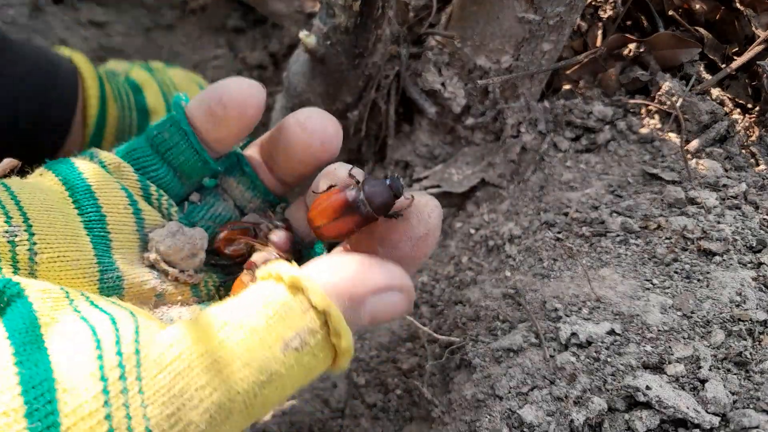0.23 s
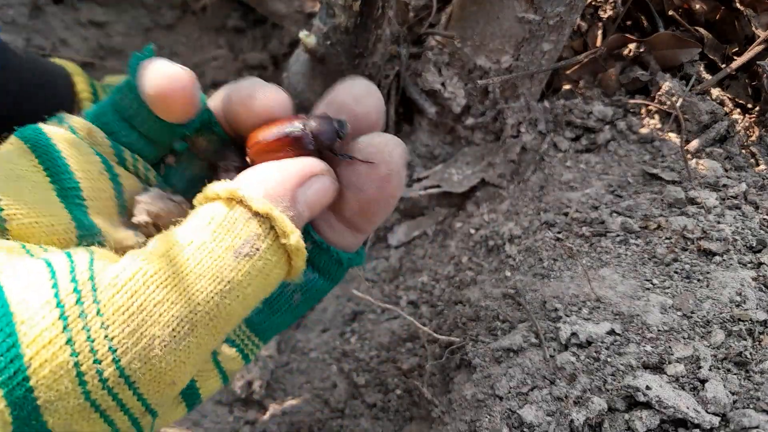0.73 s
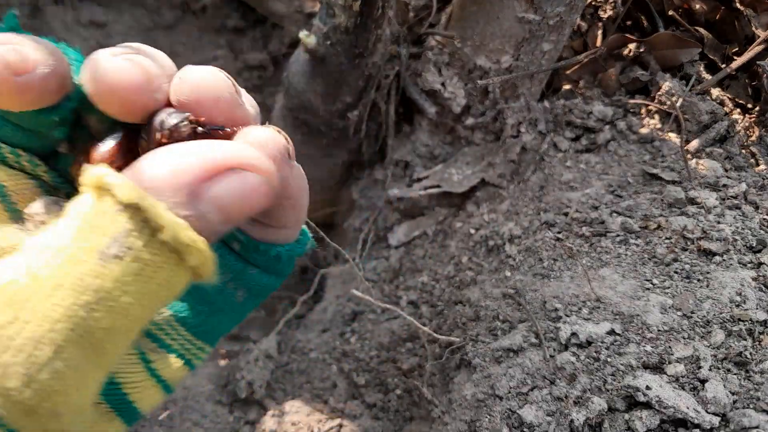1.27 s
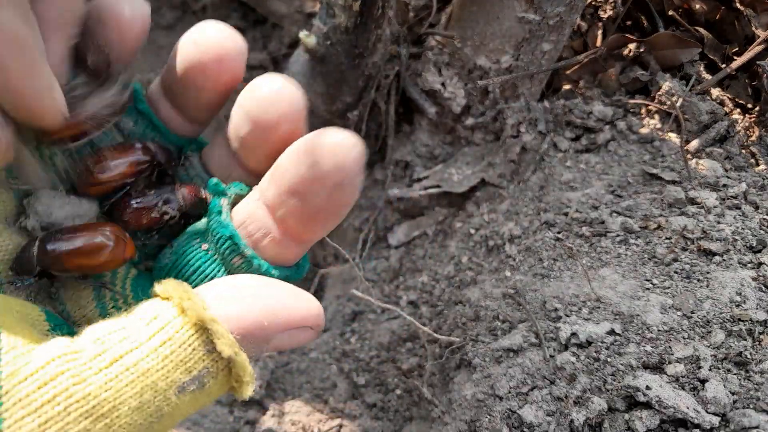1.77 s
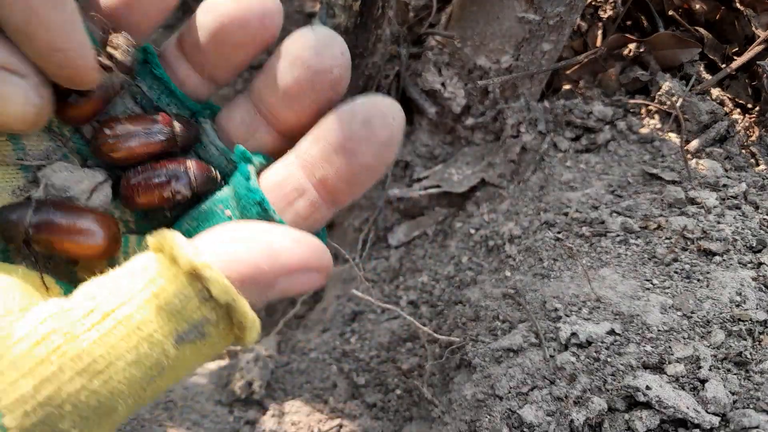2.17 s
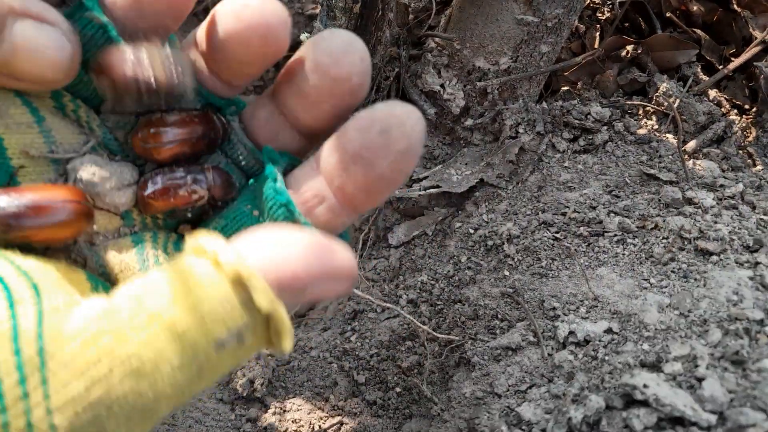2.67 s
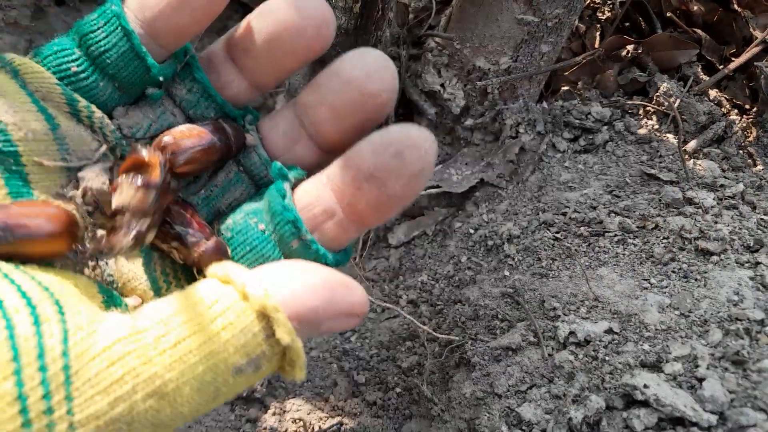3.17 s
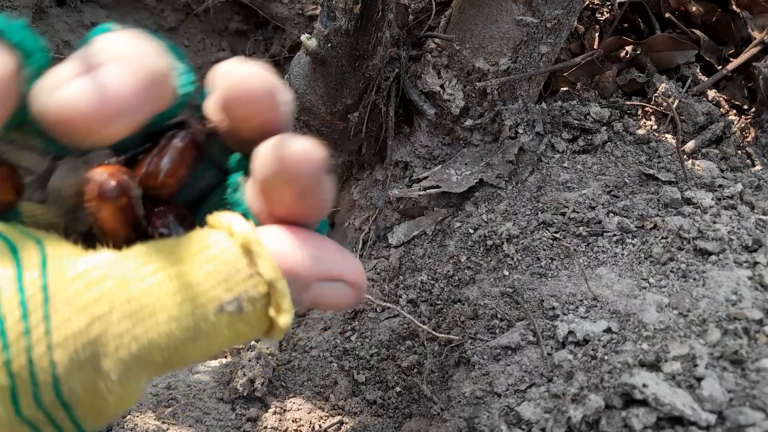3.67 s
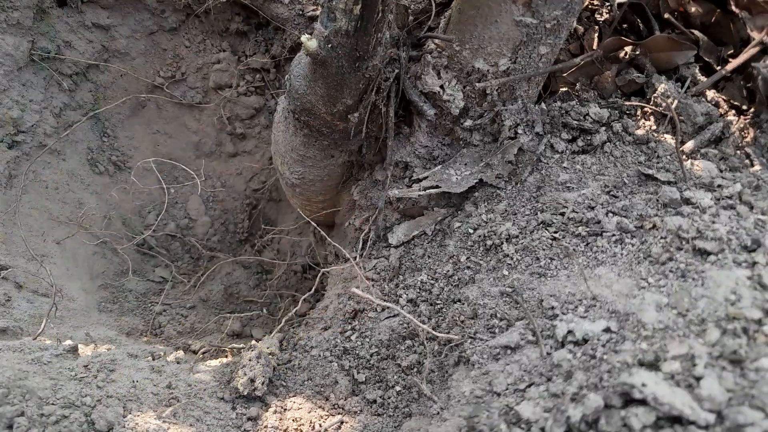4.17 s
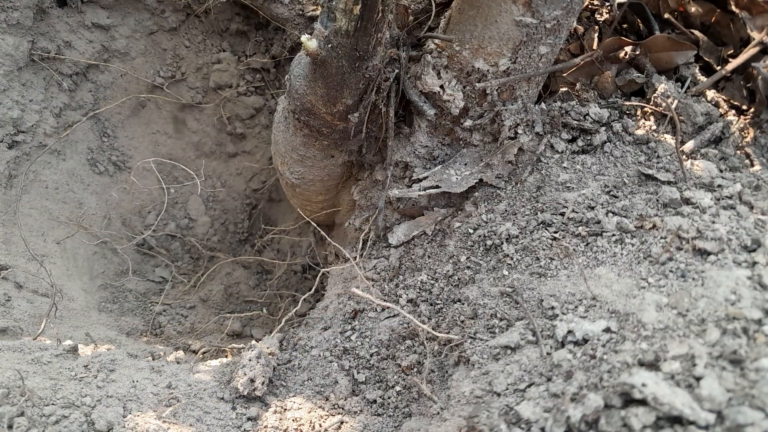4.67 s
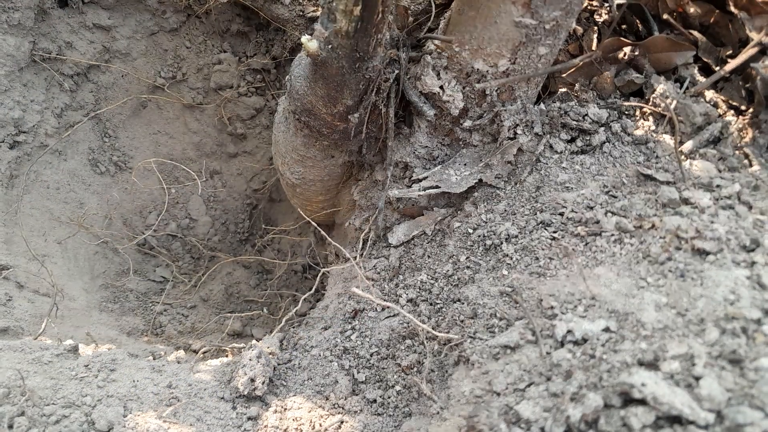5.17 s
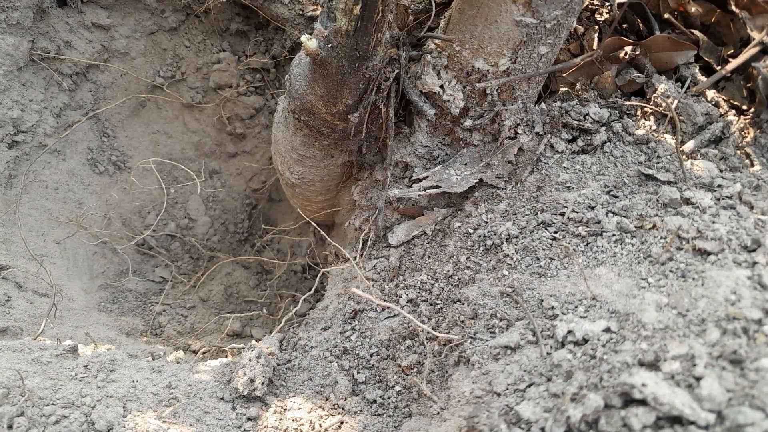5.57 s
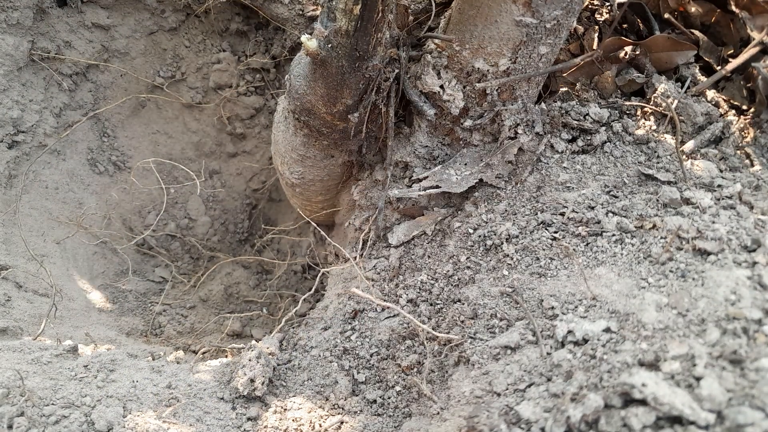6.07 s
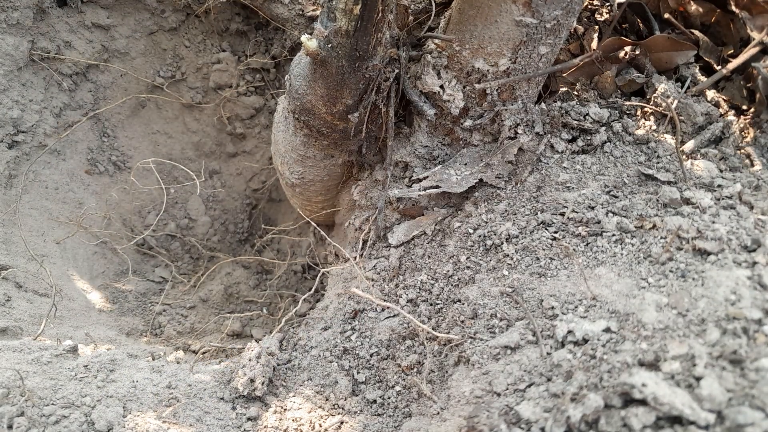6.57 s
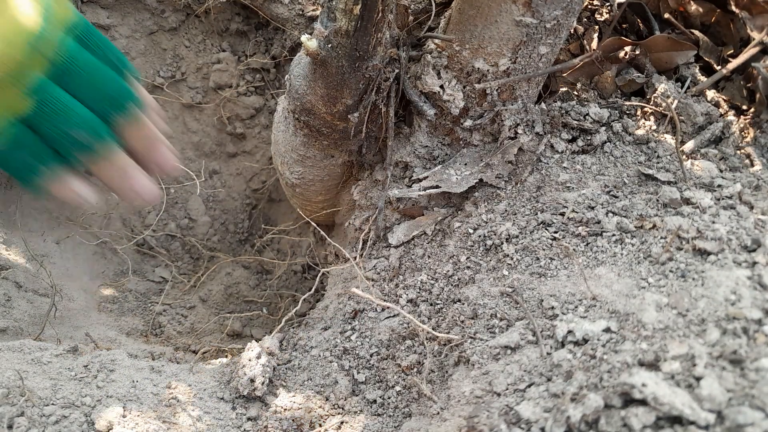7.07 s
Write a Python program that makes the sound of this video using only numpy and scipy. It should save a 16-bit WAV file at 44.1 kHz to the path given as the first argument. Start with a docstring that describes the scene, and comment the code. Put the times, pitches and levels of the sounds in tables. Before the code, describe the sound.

Close, dry digging with a small spade: gritty crunches, dull clanks and a scrape, with a glove rustling before and brushing soil after.

```python
"""A dusty knitted glove rustles, close up and outdoors. Then a small metal spade sinks into dry, crumbly
soil on the left, stirs it and knocks twice, drags over hard clods straight ahead with a dull clank, and
the glove brushes loose crumbs. Soil and yarn are showers of tiny noise grains; each knock is a cracking
clod, a damped steel ring and a ground thud. The shallow pit adds a short tail, over low rumble and hiss."""
import sys
import numpy as np
from scipy import signal
from scipy.fft import rfft, irfft
from scipy.io import wavfile
from scipy.ndimage import uniform_filter1d

SR = 44100
rng = np.random.default_rng(int(sys.argv[2]) if len(sys.argv) > 2 else 0)


def log_audio(samples):
    """Write samples as a 16-bit WAV file to the path given in sys.argv[1]."""
    # one column per channel
    frames = np.atleast_2d(samples).T
    # limit to full scale, then quantise
    limited = np.clip(frames, -1, 1)
    pcm = np.round(limited * 32767).astype(np.int16)
    wavfile.write(sys.argv[1], SR, pcm)


N = 322371

# Cue sheets. Their levels are set ahead of each layer's trim and EQ.
# blade levering loose soil: start_s, length_s, grit_db, body_db
STIR_CUES = [(3.195, 0.046, -65.5, -76.5), (3.235, 0.054, -67, -75), (3.565, 0.017, -71, -64),
             (3.79, 0.088, -66.5, -69.5), (3.875, 0.2, -56, -67), (4.055, 0.17, -55, -61.5),
             (4.26, 0.11, -51.5, -58.5), (4.435, 0.071, -59.5, -57), (4.56, 0.29, -69, -78),
             (4.86, 0.049, -59, -59.5), (4.97, 0.15, -72.5, -81), (5.14, 0.17, -78.5, -96)]
# short dry crunches of soil, from the glove rustling, the blade digging and the glove brushing:
# peak_s, level_db, rise_ms, fall_ms, body_relative_db, crisp_hz
CRUNCH_CUES = [(1.355, -47.5, 9, 6.9, -20, 8400), (1.452, -46, 0.84, 7, -23, 11300),
               (1.685, -59.5, 3.6, 10, 0.5, 9100), (2.229, -48.5, 1.6, 2.1, -30, 5330),
               (2.884, -62, 3.7, 3.8, -4, 2600), (3.245, -45, 4, 14, -12, 12400),
               (3.268, -41, 1.2, 3.4, -14, 4930), (3.283, -28, 3.46, 5, -21, 12300),
               (3.289, -23, 2.44, 1.4, -7.5, 9650), (3.34, -40.5, 2.3, 4.5, -7.5, 10800),
               (3.554, -38, 4.5, 2.3, -24, 11400), (3.599, -28.5, 3.3, 2.8, -13.5, 14500),
               (3.785, -39.5, 0.63, 1.5, -1, 10000), (3.791, -36.5, 1.55, 3.9, -5, 8100),
               (3.882, -42, 3.1, 3.2, -7.5, 9500), (3.934, -43, 5.4, 4.7, -6, 5700),
               (4.088, -37, 9.6, 1.7, -13.5, 6270), (4.113, -46, 3.9, 3, -8, 3660),
               (4.177, -44, 8.7, 9, -6, 3680), (4.226, -43.5, 3, 9.2, -6, 12700),
               (4.2866, -26, 0.31, 5.4, -9, 9500), (4.2947, -25.5, 2.57, 4, -13.5, 4100),
               (4.315, -33, 2.5, 15.4, -3.5, 9100), (4.3277, -27, 4.4, 5.7, -28, 3930),
               (4.465, -41.5, 1.07, 2.1, 5.5, 4400), (4.511, -49, 0.86, 17, -3, 5730),
               (4.874, -51.5, 5.5, 13, -1, 5200), (4.904, -46, 1.7, 24, -10, 12870),
               (6.763, -42.5, 2.6, 5.3, -36, 12500), (7.126, -44, 2, 26, -26, 7600),
               (7.178, -29, 4, 3.8, -42, 7550), (7.186, -33.5, 2, 6.8, -34, 2920),
               (7.21, -43.5, 1.06, 10.5, -12, 5840), (7.22, -30, 0.88, 0.65, -33, 7600),
               (7.282, -41, 1, 3.2, -9, 9300)]
# blade striking hard clods: time_s, crack_db, rise_ms, fall_ms, ring_db, thud_db
KNOCK_CUES = [(4.474, -62, .3, 1.8, -51.5, -49.5), (5.6463, -27, .26, 4.7, -38, -33),
              (5.6826, -24, .3, 2.05, -54, -44), (6.015, -52, .2, 5, -55.5, -57.5),
              (6.2084, -24.5, 2.3, 2.4, -27.5, -36.5), (6.281, -39, .36, 12, -40, -66),
              (6.286, -27.5, .4, 7.6, -48, -49), (6.3, -24.5, .22, 2.5, -44, -41),
              (6.3079, -30, .8, 7.5, -34.5, -44.5), (6.321, -46, .75, 2.8, -58, -66),
              (6.352, -37, .8, 3.7, -54, -60), (6.366, -34.5, .9, 6.4, -44, -65)]
# blade dragged flat over packed earth: start_s, length_s, rasp_db, body_db
DRAG_CUES = [(5.68, 0.066, -63.5, -77), (5.8, 0.14, -64.5, -72.5), (5.9, .06, -62.5, -75),
             (5.995, 0.093, -55.5, -66.5), (6.105, 0.094, -46.5, -69), (6.205, 0.026, -50.5, -48),
             (6.28, 0.11, -48.5, -60.5), (6.42, 0.09, -57.5, -72), (6.58, 0.097, -65.5, -80)]
# single crumbs snapping or dropping: time_s, level_db
CRUMB_CUES = [(0.0837, -67), (.7322, -58), (1.1036, -55), (1.1566, -58), (1.181, -50.5), (1.241, -48.5),
              (1.317, -49), (1.435, -46), (1.478, -42.5), (1.4826, -39), (1.4919, -47), (1.682, -50.5),
              (1.9244, -57), (2.28, -53.5), (2.346, -56.5), (2.739, -58.5), (2.8412, -57), (3.177, -57.5),
              (3.8315, -51), (4.0888, -32), (5.089, -49), (5.4146, -57.5), (5.8236, -51), (6.793, -44),
              (7.0731, -50), (7.2483, -46)]
# glove flexing: start_s, length_s, crackle_db, rub_db
FLEX_CUES = [(.815, 0.42, -75.5, -74), (1.09, 0.14, -71.5, -71), (1.24, 0.14, -63.5, -69),
             (1.385, 0.12, -69, -89), (1.52, 0.15, -78.5, -96), (1.67, 0.16, -71.5, -88),
             (1.88, 0.16, -76.5, -93), (2.16, 0.092, -68, -89), (2.42, .11, -74.5, -90),
             (2.79, 0.11, -79.5, -82)]
# glove sweeping the soil: start_s, length_s, grit_db, sizzle_db, sizzle_hz
SWEEP_CUES = [(6.736, 0.097, -57.5, -54, 13000), (6.862, 0.066, -57, -50, 12700),
              (6.934, 0.098, -57, -48, 12900), (7.059, 0.1, -57, -51, 11500),
              (7.15, 0.19, -57.5, -60, 12100)]
# hand and tool bumping the ground: peak_s, level_db
BUMP_CUES = [(.54, -66), (3.271, -52), (3.745, -56), (4.311, -54), (4.501, -53), (4.622, -57), (5.302, -63),
             (5.665, -52), (6.219, -63), (6.309, -54), (6.514, -56), (6.794, -59), (7.137, -54),
             (7.215, -62)]
# brief dips in the rumble: time_s, dip_db
LULL_CUES = [(.39, -8.5), (1.23, -8.5), (2.2, -11), (2.58, -0.5), (2.73, -8), (3.11, -8.5), (4.0, -2),
             (5.19, -8), (5.5, -9), (5.82, -7.5), (6.69, -3.5), (6.95, -4)]

# ringing modes: pitch_hz, level_db, t60_s
BLADE_MODES = [(1813, 8, 0.03), (2028, 6.5, 0.022), (2236, 2.5, 0.032), (2440, -22, 0.036),
               (2590, -18, 0.13), (3020, 8, 0.016), (4070, -13, 0.028), (4900, -6, 0.013)]  # steel damped by soil
THUD_MODES = [(149, -7, 0.033), (239.3, -1, 0.088), (339, 0.5, 0.064), (424, -1, 0.073), (630, 3, 0.017),
              (705, 5, 0.034), (1035, 6, 0.035), (1230, 6, 0.019)]  # handle and packed ground

# EQ shapes of the layers: frequency_hz, relative_db
STREAM_EQ = [(1000, -9), (1400, -12.5), (2000, -3.5), (2550, -9), (3100, -3.5), (3750, 1), (5000, -1.5),
             (6000, -0.5), (7200, -5.5), (9500, -2.5), (12000, -1), (16000, -5)]  # sand streaming along the blade
GROAN_EQ = [(120, -6.5), (230, -5), (340, 0.5), (430, 6), (560, 0), (750, -5.5), (1000, -8), (1800, -24),
            (4000, -30)]  # hollow cut
GRIT_EQ = [(900, -23.5), (2000, -12.5), (2700, -4.5), (3500, -2.5), (5000, -1), (6300, -2.5), (8000, -2.5),
           (10500, -2), (13500, -3), (16000, -10)]  # bright top of loose soil
BODY_EQ = [(90, -3), (200, 1.5), (350, 0.5), (620, 2), (850, 1), (1100, -1), (1500, -4), (2200, -3),
           (4000, -13)]  # dull body of soil and glove
CRACK_EQ = [(150, -22), (600, -1), (1200, -3), (2200, -0.5), (4300, -1.5), (6000, -6.5), (8000, -8),
            (10500, -6.5), (16000, -17.5)]  # struck clod
RASP_EQ = [(300, -20), (620, -4.5), (900, -11), (1400, -6), (1850, -3), (2500, -1.5), (3300, -6.5),
           (4500, -6), (7500, -12), (9800, -10.5), (12000, -10.5), (16000, -15)]  # steel on packed earth
DRAG_BODY_EQ = [(90, -4), (200, -2.5), (330, 0), (480, -3), (700, -12.5), (1500, -21.5)]  # weight under the rasp
SNAP_EQ = [(600, -21.5), (2000, -18.5), (3500, -3.5), (5500, -1.5), (8000, 0.5), (12000, 1.5),
           (16000, -2.5)]  # snapping crumb
YARN_EQ = [(350, -34), (600, -7), (997, -5.5), (1190, -22), (1700, -2.5), (2720, -4.5), (4840, -1),
           (10200, -2.5), (16000, -4)]  # crackling yarn
BRUSH_EQ = [(250, -1.5), (650, -4), (1000, -7), (1600, -4.5), (2100, -3), (3100, 0.5), (5500, -2),
            (6500, -1.5), (7800, -3), (10000, -10.5), (13000, -7), (16000, -21)]  # glove on soil
RUMBLE_EQ = [(20, -36.5), (40, -8), (62, 1.5), (85, -2.5), (120, -4.5), (170, -14.5), (260, -22.5),
             (500, -34), (1000, -55.5)]  # outdoor low end
AIR_EQ = [(120, -16.5), (200, -1), (491, -11.5), (851, -13.5), (950, -16), (2020, -19), (3490, -21),
          (9580, -16), (15100, -19), (16000, -31.5)]  # outdoor hiss

# stereo balance at the microphone: frequency_hz, left_over_right_db
LEFT_BALANCE = [(200, -0.5), (500, -1), (950, 5), (1700, -3.5), (2500, 1), (3600, 3.5), (6000, 7),
                (9500, 5), (14000, 9)]  # work on the left
AHEAD_BALANCE = [(300, -1), (1300, -8), (2500, -6.5), (6000, -1.5), (14000, 1)]  # blows straight ahead

SHIFT_S = 5.8  # the knocks move from the left of the pit to straight ahead
SWEEP_ATTACK_S, SWEEP_RELEASE_S = 0.041, 0.048


def plunge():
    """One long push: sand streams louder along the sinking blade while the cut's hollow groan is choked."""
    push = dict(start_s=3.305, length_s=0.27, attack_s=0.026, release_s=0.015)
    stream = amp(-47.5) * stroke(**push, swell_db=6) * grains(per_s=5000, spread_db=1.9, alike=0.31)
    groan = amp(-57) * stroke(**push, swell_db=-10.5) * grains(per_s=1200, spread_db=1.9, alike=1)
    return colour(stream, STREAM_EQ) + colour(groan, GROAN_EQ)


def loose_soil():
    """Grit under each stir, and short dry crunches as the glove rustles, the blade digs, the glove brushes."""
    flicker = wander(depth_db=0.6, slow_s=0.013)
    grit_gain, body_gain = strokes(STIR_CUES, attack_s=0.017, release_s=0.051) * flicker
    grit = amp(0.5) * grit_gain * grains(per_s=1900, spread_db=3.7, alike=0.047)
    body = amp(1) * body_gain * grains(per_s=700, spread_db=1.7, alike=0.61)
    for peak_s, db, rise_ms, fall_ms, body_db, crisp_hz in CRUNCH_CUES:
        lead_s, crisp = burst(rise_ms, fall_ms, alike=0.13, rough_db=2.5)
        crisp += 2.36 * resonate(crisp, crisp_hz, width_hz=490)
        add(grit, peak_s - lead_s, amp(db - 4.5) * crisp)
        lead_s, dull = burst(rise_ms, fall_ms * 1.8, alike=0.58, rough_db=1.5)
        hollow_hz = 890 * 2 ** rng.uniform(-0.378, 0.6)  # each crunch has its own hollow note
        dull += 0.53 * resonate(dull, hollow_hz, width_hz=130)
        add(body, peak_s - lead_s, amp(db + body_db - 3.5) * dull)
    return colour(grit, GRIT_EQ) + colour(body, BODY_EQ)


def knocks():
    """Each blow cracks a clod, rings the blade and thuds into the ground: first on the left, then ahead."""
    left, ahead = np.zeros((2, 2, N))
    for time_s, crack_db, rise_ms, fall_ms, ring_db, thud_db in KNOCK_CUES:
        spot = left if time_s < SHIFT_S else ahead
        lead_s, crack = burst(rise_ms, fall_ms, alike=0.62, rough_db=-1)
        clank = amp(ring_db + 1.5) * ring(BLADE_MODES, attack_ms=0.94, detune=0.0034)
        thud = amp(thud_db + 1) * ring(THUD_MODES, attack_ms=0.86, detune=0.038)
        add(spot, time_s - lead_s, colour(amp(crack_db) * crack, CRACK_EQ))
        add(spot, time_s, np.tile(clank + thud, (2, 1)))
    return place(left, balance_db=0.5, lead_ms=0.427) + place(ahead, AHEAD_BALANCE, lead_ms=-0.052)


def dragging():
    """The flat of the blade rasps over packed earth straight ahead."""
    rasp_gain, body_gain = strokes(DRAG_CUES, attack_s=0.007, release_s=0.041, swell_db=3)
    rasp = amp(0.7) * rasp_gain * grains(per_s=3000, spread_db=2.4, alike=0.16)
    body = amp(6) * body_gain * grains(per_s=600, spread_db=1.1, alike=0.9)
    return place(colour(rasp, RASP_EQ) + colour(body, DRAG_BODY_EQ), balance_db=-1.5, lead_ms=-0.11)


def crumbs():
    """A dry crumb snaps in one sharp tick, then its dust gives a tiny puff."""
    out = np.zeros((2, N))
    for time_s, db in CRUMB_CUES:
        tick = rng.choice([-1, 1]) * np.ones((2, 1))
        _, puff = burst(rise_ms=0.089, fall_ms=1, alike=0.24, rough_db=2)
        add(out, time_s, amp(db + 14) * tick)
        add(out, time_s, amp(db + 2.5) * puff)
    return colour(out, SNAP_EQ)


def glove():
    """Knitted yarn rubs dust and sheds crumbs in the palm, and later brushes the ground."""
    flicker = wander(depth_db=3.3, slow_s=0.05)
    crackle_gain, rub_gain = strokes(FLEX_CUES, attack_s=0.023, release_s=0.043) * flicker
    sweep_gain, _ = strokes(SWEEP_CUES, SWEEP_ATTACK_S, SWEEP_RELEASE_S)
    crackle = amp(1.5) * crackle_gain * grains(per_s=1200, spread_db=3.2, alike=0.17)
    shed = amp(-3.5) * crackle_gain * grains(per_s=19, spread_db=1.2, alike=0.27)
    rub = amp(-4) * rub_gain * grains(per_s=600, spread_db=3.8, alike=0.62)
    brush = amp(-2) * sweep_gain * grains(per_s=1500, spread_db=3.2, alike=0.094)
    palm = colour(crackle, YARN_EQ) + colour(shed, SNAP_EQ) + colour(rub, BODY_EQ)
    return palm + mottle(colour(brush, BRUSH_EQ), patch_db=1.5, patch_hz=1000, patch_ms=190)


def yarn_sizzle():
    """Yarn sliding over fine dust hisses unevenly, at a pitch that differs with each sweep."""
    start_s, length_s, _, _, sizzle_hz = np.transpose(SWEEP_CUES)
    hz = np.interp(np.arange(N) / SR, start_s + length_s / 2, sizzle_hz)
    _, gain = strokes(SWEEP_CUES, SWEEP_ATTACK_S, SWEEP_RELEASE_S) * wander(depth_db=3, slow_s=0.011)
    dust = grains(per_s=1200, spread_db=2.9, alike=0.19, fall_ms=1.5)
    hiss = unit(resonate(resonate(dust, hz, width_hz=4400), hz, width_hz=4600))
    return place(amp(-4) * gain * hiss, balance_db=1, lead_ms=0.298)


def ground_bumps():
    """The packed ground gives under a soft push and swings a few slow cycles."""
    out = np.zeros((2, N))
    t = np.arange(-SR // 10, SR // 10) / SR
    for peak_s, db in BUMP_CUES:
        swing = sum(amp(mode_db) * np.sin(2 * np.pi * (hz * rng.uniform(0.73, 1.08) * t + rng.random()))
                    for hz, mode_db in [(76, 0), (130, -7.5), (195, -16.5)])
        push = amp(db) * swing * np.exp(-(t / 0.029) ** 2)
        add(out, peak_s + t[0], np.array([push, push]))
    return out


def earth_banks(x, t60_s=0.13, wet_db=-15):
    """Earth banks and trunks scatter a short, weak tail."""
    t = np.arange(SR // 3) / SR
    echoes = rng.standard_normal((2, len(t))) * (rng.random((2, len(t))) < 0.06)
    echoes *= amp(-60 * t / t60_s) * (t > 0.003)
    return x + amp(wet_db) * signal.oaconvolve(x, echoes / np.linalg.norm(echoes[0]), axes=1)[:, :N]


def outdoors(dip_half_s=0.072):
    """The ambience bed: a low uneven rumble that dips now and then, and a faint even hiss."""
    t = np.arange(N) / SR
    dips_db = sum(db * np.exp(-((t - time_s) / dip_half_s) ** 2) for time_s, db in LULL_CUES)
    rumble_gain = amp(-65 + dips_db) * wander(depth_db=0.96, slow_s=0.1)
    rumble = rumble_gain * colour(stereo_noise(N, alike=0.42), RUMBLE_EQ)
    return rumble + amp(-74.5) * colour(stereo_noise(N, alike=0.084), AIR_EQ)


def grains(per_s, spread_db, alike, fall_ms=1):
    """Random fractures of uneven size, each a tiny puff that dies at once."""
    size = amp(spread_db * np.minimum(rng.exponential(1, N), 4.5))
    fires = rng.random(N) < per_s / SR
    power = signal.lfilter([1], [1, -np.exp(-2000 / (fall_ms * SR))], fires * size ** 2)
    return unit(np.sqrt(power) * stereo_noise(N, alike))


def burst(rise_ms, fall_ms, alike, rough_db):
    """A clump of fractures that peaks and dies away; returns its lead-in in seconds and its sound."""
    ms = np.arange(-5 * rise_ms, 7 * fall_ms, 1000 / SR)
    envelope = np.exp(np.minimum(ms / rise_ms, -ms / fall_ms))
    lumps = unit(uniform_filter1d(rng.standard_normal(SR // 2), size=24))[:len(ms)]
    sound = envelope * amp(rough_db * lumps) * stereo_noise(SR // 2, alike)[:, :len(ms)]
    return -ms[0] / 1000, unit(sound) * np.sqrt(np.mean(envelope ** 2))


def ring(modes, attack_ms, detune):
    """Modes set ringing by a blow; the grip of the soil shifts them a little each time."""
    t = np.arange(SR // 5) / SR
    sound = np.zeros(len(t))
    for hz, db, t60_s in modes:
        shifted_hz = hz * (1 + detune * rng.normal())
        sound += amp(db - 60 * t / t60_s) * np.sin(2 * np.pi * (shifted_hz * t + rng.random()))
    sound *= 1 - np.exp(-1000 * t / attack_ms)
    return sound / np.sqrt(np.mean(sound[:SR // 125] ** 2))  # the first 8 ms set the level


def stroke(start_s, length_s, attack_s, release_s, swell_db):
    """Envelope of one stroke: it takes hold, swells or fades evenly while it lasts, and dies away."""
    t = np.arange(N) / SR - start_s
    swell = amp(swell_db * (np.clip(t / length_s, 0, 1) - 0.5))
    return np.clip(t / attack_s, 0, 1) * swell * np.exp(-np.maximum(t - length_s, 0) / release_s)


def strokes(cues, attack_s, release_s, swell_db=0):
    """Envelopes for the two layers of a cue sheet; overlaps add in power."""
    power = np.zeros((2, N))
    for start_s, length_s, first_db, second_db, *_ in cues:
        envelope = stroke(start_s, length_s, attack_s, release_s, swell_db)
        power += (amp([[first_db], [second_db]]) * envelope) ** 2
    return np.sqrt(power)


def wander(depth_db, slow_s):
    """A gain that drifts at random."""
    hz = np.fft.rfftfreq(N, 1 / SR)
    drift = unit(irfft(rfft(rng.standard_normal(N)) * np.exp(-(hz * slow_s) ** 2), N))
    return amp(depth_db * np.clip(drift, -2, 2))


def mottle(x, patch_db, patch_hz, patch_ms):
    """The shifting contact favours some pitches and then others: patches of colour that come and go."""
    spectra = signal.stft(x, SR, nperseg=512, noverlap=384)[2]
    across = np.fft.fftfreq(spectra.shape[1], SR / 512)[:, None] * patch_hz
    along = np.fft.fftfreq(spectra.shape[2], 128000 / SR) * patch_ms
    blur = np.exp(-2 * (across ** 2 + along ** 2))
    patches = unit(np.fft.ifft2(np.fft.fft2(rng.standard_normal(blur.shape)) * blur).real)
    gain = unit(amp(patch_db * np.clip(patches, -2, 2)))
    return signal.istft(spectra * gain, SR, nperseg=512, noverlap=384)[1][:, :N]


def resonate(x, hz, width_hz):
    """A unity-gain resonance that can follow a moving pitch."""
    turn = np.exp(2j * np.pi * np.cumsum(hz * np.ones(x.shape[1])) / SR)
    pole = np.exp(-np.pi * width_hz / SR)
    return 2 * (turn * signal.lfilter([1 - pole], [1, -pole], x / turn)).real


def colour(x, eq):
    """Minimum-phase EQ of unit energy, so attacks stay sharp."""
    hz = abs(np.fft.fftfreq(4096, 1 / SR))
    log_gain = np.log(amp(np.maximum(curve_db(eq, hz), -100)))
    taps = np.fft.ifft(np.exp(np.conj(signal.hilbert(log_gain)))).real
    return signal.oaconvolve(x, taps[None] / np.linalg.norm(taps), axes=1)[:, :N]


def place(x, balance_db, lead_ms):
    """Pans by level (a number or a curve) and delay; positive makes the left louder and earlier."""
    hz = np.fft.rfftfreq(x.shape[1], 1 / SR)
    tilt = amp((curve_db(balance_db, hz) if np.ndim(balance_db) else np.full_like(hz, balance_db)) / 2)
    delay = np.exp(-2j * np.pi * hz * lead_ms / 1000)
    pan = np.array([tilt, delay / tilt]) / np.sqrt((tilt ** 2 + tilt ** -2) / 2)
    return irfft(rfft(x) * pan, x.shape[1])


def stereo_noise(count, alike):
    """White noise, from fully wide (alike 0) to mono (alike 1)."""
    shared, left, right = rng.standard_normal((3, count))
    return np.sqrt(alike) * shared + np.sqrt(1 - alike) * np.array([left, right])


def curve_db(points, hz):
    """Reads a curve on a log-frequency axis."""
    point_hz, db = np.transpose(points)
    return np.interp(np.log(hz + 1), np.log(point_hz + 1), db)


def add(mix, start_s, sound):
    """Lays a stereo sound into the mix."""
    part = mix[:, max(round(start_s * SR), 0):][:, :sound.shape[1]]
    part += sound[:, :part.shape[1]]


def amp(db):
    """Decibels to gain."""
    return 10 ** (np.asarray(db) / 20)


def unit(x):
    """Scales to an rms of one."""
    return x / np.sqrt(np.mean(x ** 2) + 1e-30)


def scene():
    """The mix: soil and glove on the left, dragging in front, knocks in both spots, ambience beneath."""
    soil = mottle(plunge() + loose_soil(), patch_db=2, patch_hz=696, patch_ms=28)
    left_side = place(soil + crumbs() + glove(), LEFT_BALANCE, lead_ms=0.483)
    hard_earth = mottle(dragging(), patch_db=4, patch_hz=600, patch_ms=63) + knocks()
    return earth_banks(left_side + yarn_sizzle() + hard_earth) + ground_bumps() + outdoors()


def record(dry, low_cut_hz=42, high_cut_hz=16100):
    """The microphone drops the deepest bass; a steep high cut takes off the very top."""
    thinned = signal.sosfilt(signal.butter(3, low_cut_hz, "highpass", fs=SR, output="sos"), dry)
    high_cut = signal.firwin(401, high_cut_hz, window=("kaiser", 8), fs=SR)
    return signal.oaconvolve(thinned, high_cut[None], "same", axes=1)


dry = scene()
out = record(dry)
log_audio(out)
```